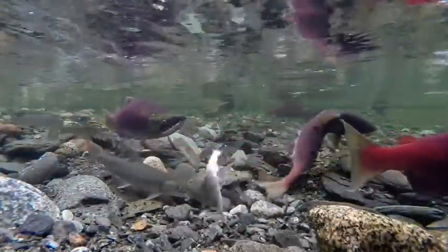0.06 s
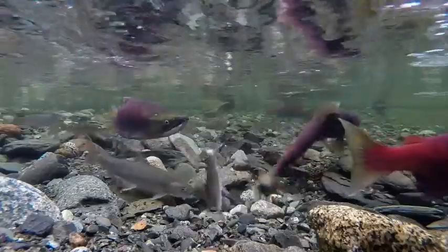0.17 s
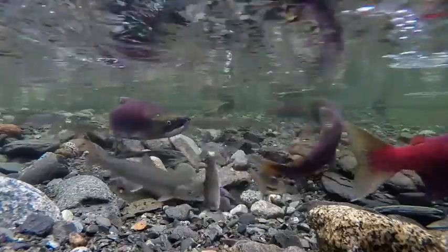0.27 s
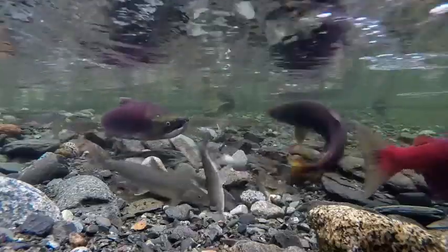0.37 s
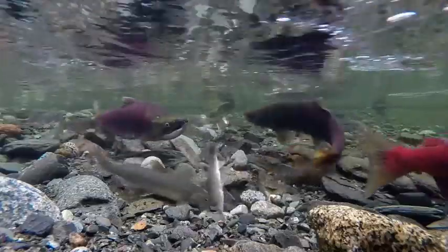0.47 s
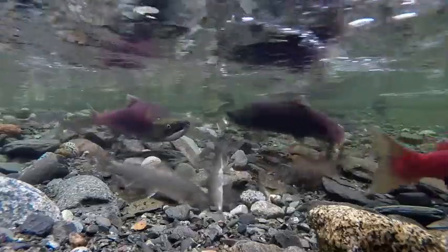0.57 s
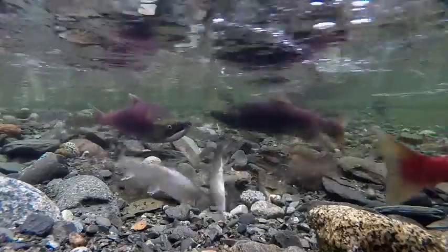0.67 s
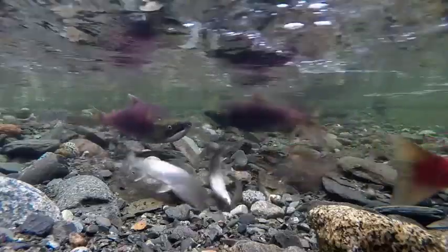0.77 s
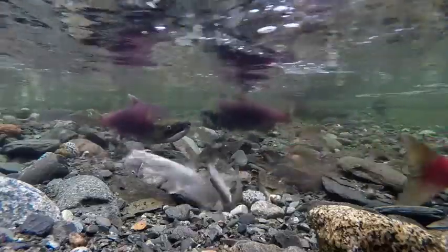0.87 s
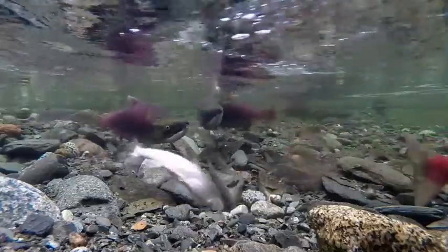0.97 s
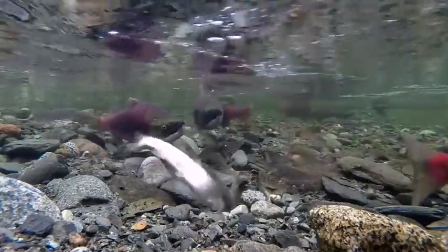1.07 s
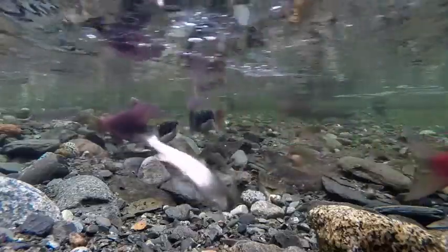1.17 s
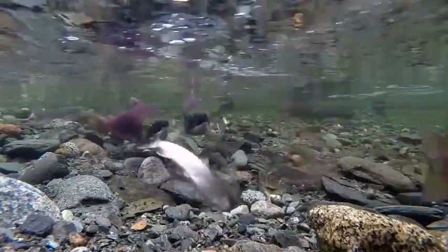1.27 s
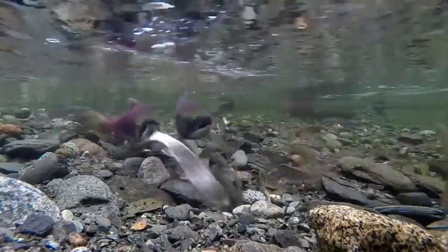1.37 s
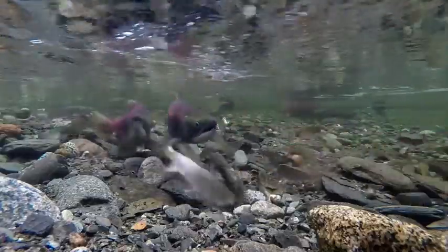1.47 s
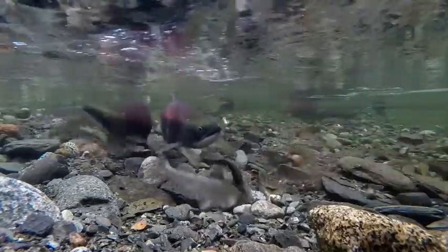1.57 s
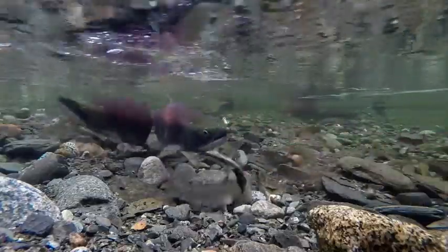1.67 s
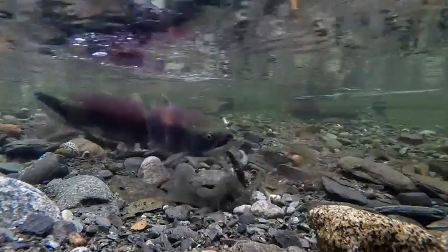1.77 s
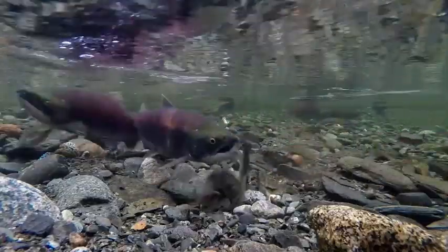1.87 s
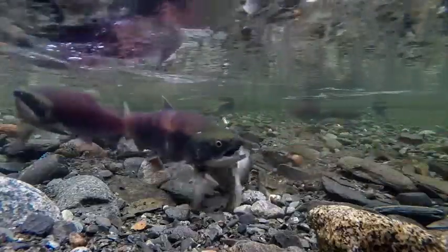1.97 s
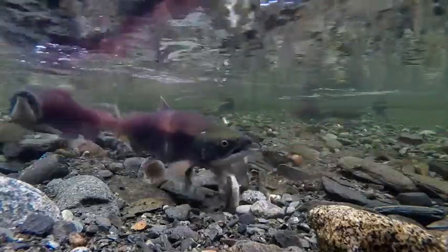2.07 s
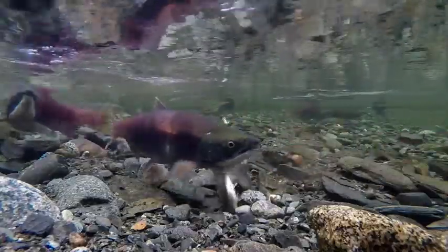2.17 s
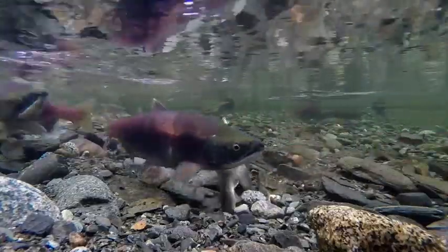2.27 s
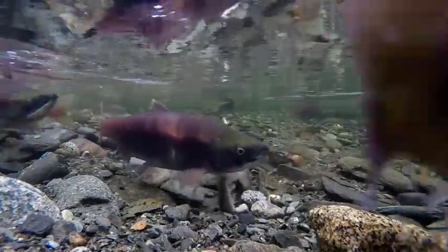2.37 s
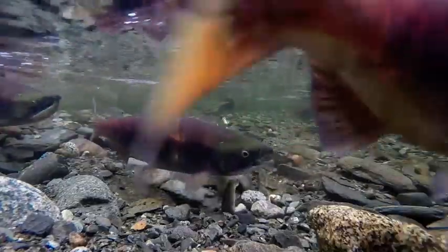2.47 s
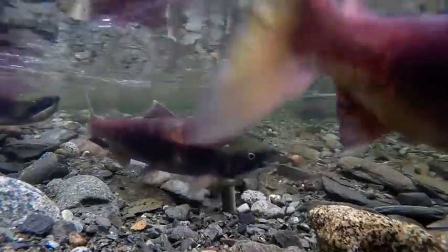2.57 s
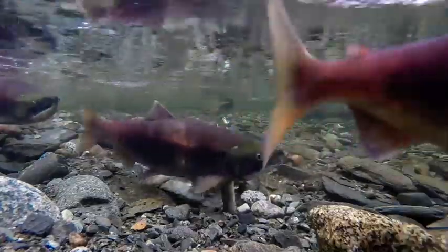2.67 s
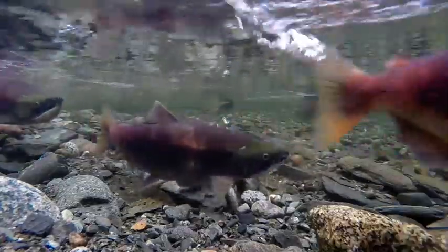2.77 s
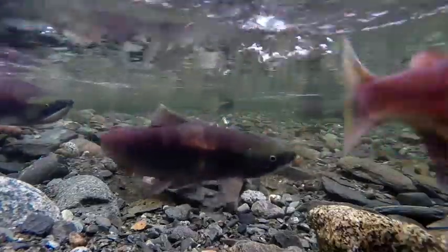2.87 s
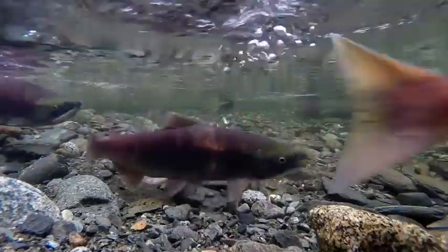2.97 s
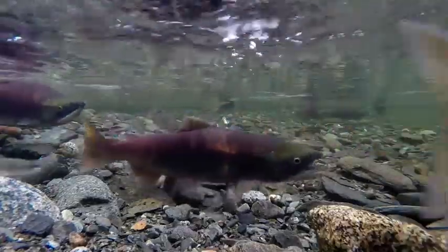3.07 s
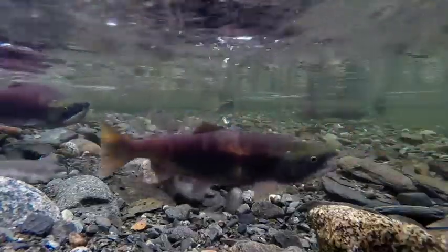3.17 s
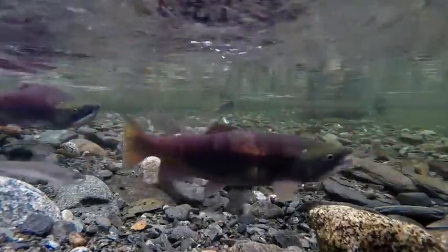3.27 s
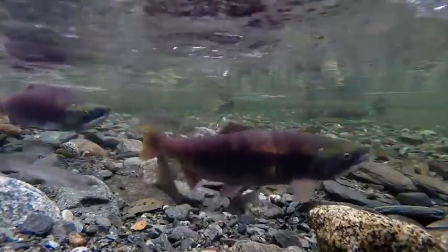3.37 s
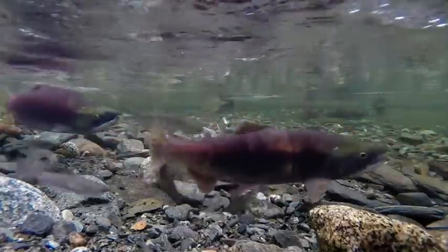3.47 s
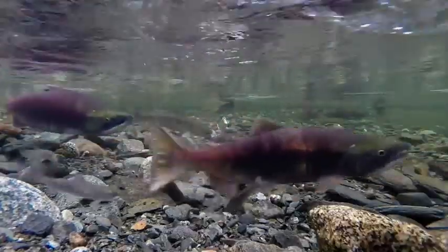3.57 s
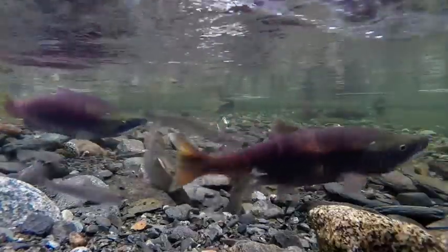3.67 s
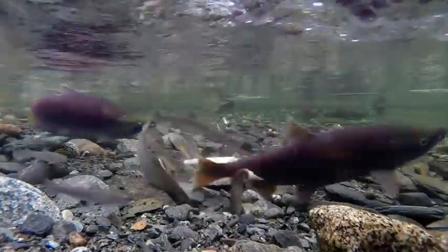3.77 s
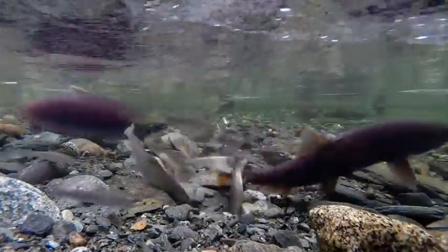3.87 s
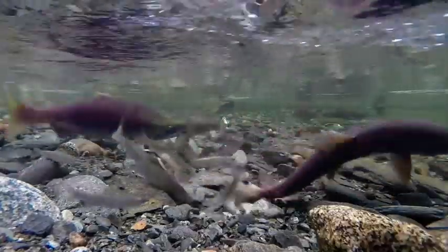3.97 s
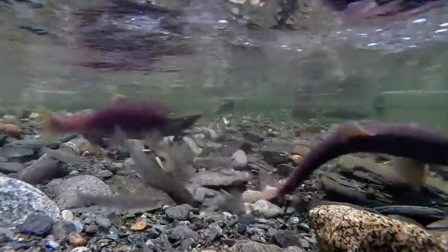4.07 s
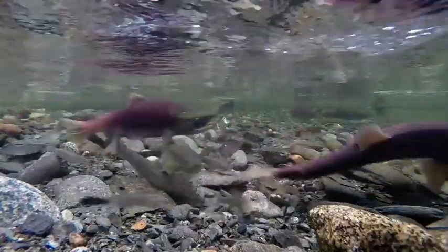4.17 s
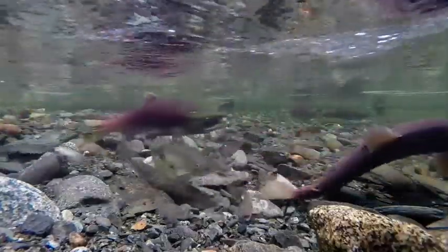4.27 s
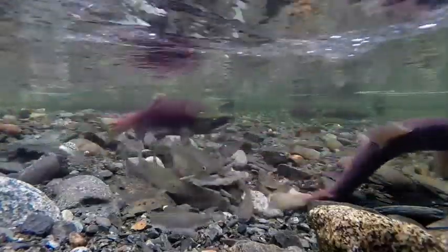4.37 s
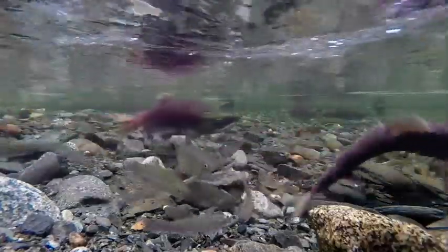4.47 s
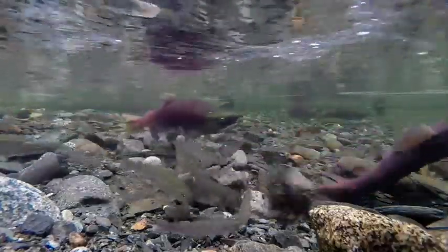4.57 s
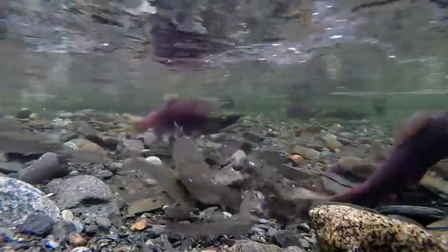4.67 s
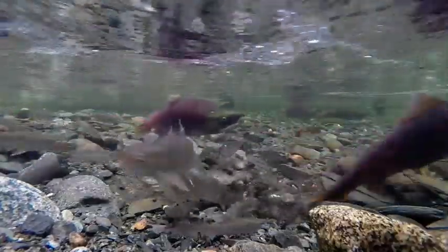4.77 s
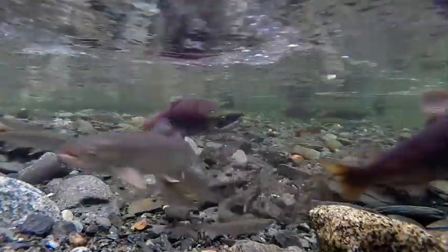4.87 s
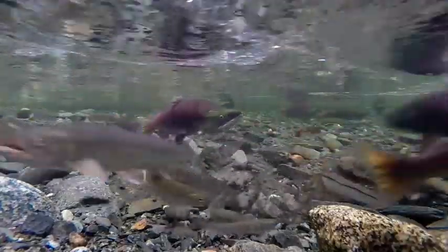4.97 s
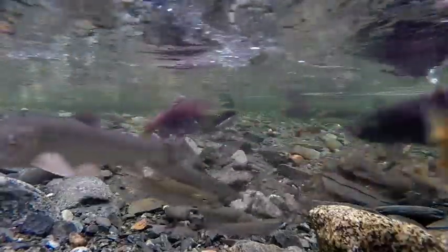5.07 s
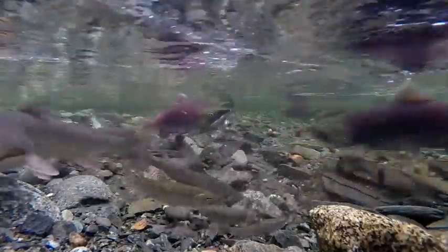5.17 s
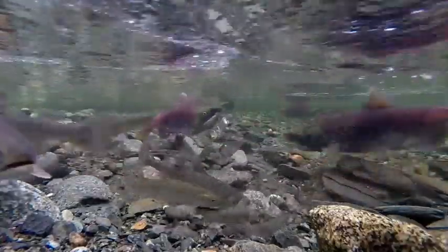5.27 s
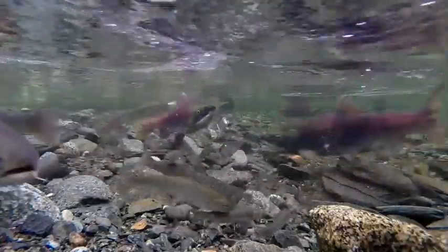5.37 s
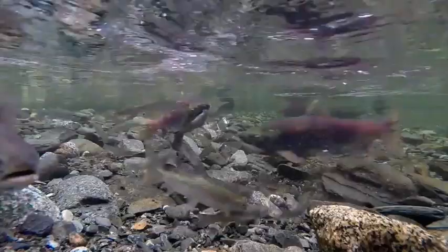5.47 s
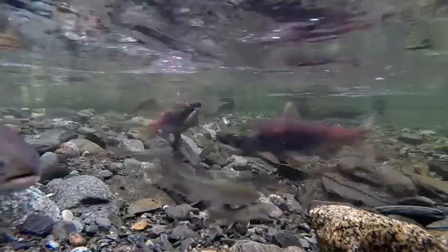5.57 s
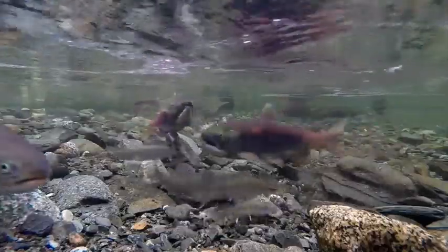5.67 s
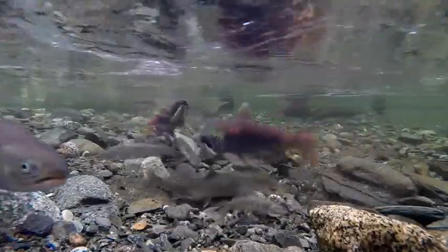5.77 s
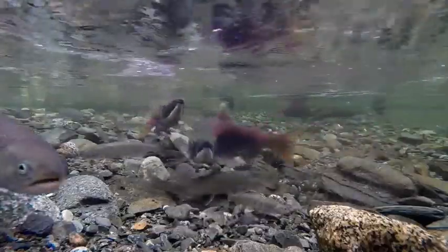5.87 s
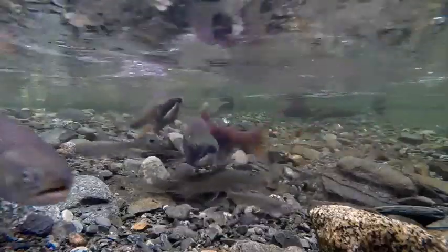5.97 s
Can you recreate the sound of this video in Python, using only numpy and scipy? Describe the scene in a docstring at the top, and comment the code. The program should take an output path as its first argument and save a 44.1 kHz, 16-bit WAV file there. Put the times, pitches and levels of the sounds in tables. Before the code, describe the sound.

Heard from inside a sealed housing under a shallow stream: pebbles click and gravel crackles in a short burst, then it quiets to soft rumbling and sparse ticks. Midway a fish brushes and loudly knocks the housing, which shudders deeply. A muffled splash and blipping bubbles follow, then stones clatter again, harder and denser, before fading to faint hiss.

```python
"""Salmon stir the gravel of a shallow stream, heard by a microphone in a camera housing under water.
Pebbles click and gravel crackles through the housing's resonances, as single filtered clicks and showers of
random grains, with a few bubbles and one short 6.4 kHz ring; tail beats rumble, and the current hisses.
Midway a fish brushes and knocks the housing, which rings and rocks on its mount; then its tail tears
the surface, bubbles sound as dying tones, foam fizzes faintly, and the stones clatter again."""
import sys
import numpy as np
from scipy import signal
from scipy.fft import rfft, irfft
from scipy.io import wavfile
from scipy.ndimage import uniform_filter1d

SR = 44100
rng = np.random.default_rng(int(sys.argv[2]) if len(sys.argv) > 2 else 0)


def output_pcm(signal):
    """Save a mono or channel-first signal as 16-bit PCM at the path in sys.argv[1].

    Samples are clipped to [-1, 1] before scaling.
    """
    pcm = np.clip(np.atleast_2d(signal).T, -1, 1) * 32767
    wavfile.write(sys.argv[1], SR, np.round(pcm).astype(np.int16))


N = 265041
TIME = np.arange(N) / SR
TAPS_HZ = np.fft.rfftfreq(4096, 1 / SR)  # frequency grid of the short clicks


def gain_of(db):
    """Decibels to amplitude."""
    return 10 ** (np.asarray(db) / 20)


def evened(x):
    """Scales to rms 1."""
    return x / np.sqrt(np.mean(x ** 2) + 1e-20)


def spectrum_db(points, hz):
    """Reads a spectrum's dB on a log-frequency axis."""
    points_hz, db = np.transpose(points)
    return np.interp(np.log(hz + 1), np.log(points_hz + 1), db)


def level_curve(rows):
    """A dB curve as a gain for every sample, silent outside its span."""
    s, db = np.transpose(rows)
    return gain_of(np.interp(TIME, s, db)) * (TIME >= s[0]) * (TIME <= s[-1])


def swell(s, db, rise_s, hold_s, fall_db_per_s):
    """A gain that rises smoothly to its full level at time s, holds, and dies away."""
    rise = np.exp(-(np.minimum(TIME - s, 0) / rise_s) ** 2)
    return rise * gain_of(db - fall_db_per_s * np.maximum(TIME - s - hold_s, 0))


def add(mix, s, sound):
    """Mixes a sound in at time s."""
    part = mix[max(round(s * SR), 0):][:len(sound)]
    part += sound[:len(part)]


def noise(points):
    """Noise of rms 1 with the given spectrum."""
    shape = gain_of(spectrum_db(points, np.fft.rfftfreq(N, 1 / SR)))
    return evened(irfft(rfft(rng.standard_normal(N)) * shape, N))


def wander(hz):
    """Slow chance of rms 1, up to the given rate."""
    slow = np.fft.rfftfreq(N, 1 / SR) < hz
    return evened(irfft(rfft(rng.standard_normal(N)) * slow, N))


def causal(db):
    """The sharpest click that has this spectrum: its minimum-phase response."""
    log_gain = np.log(gain_of(np.maximum(db, db.max() - 100)))
    circle = np.concatenate([log_gain, log_gain[-2:0:-1]])
    return np.fft.ifft(np.exp(np.conj(signal.hilbert(circle)))).real


def click(treble_db, scatter_db=1.0, neutral_db=-12, knee_hz=2400, shelf_hz=8000, top_hz=14000, low_hz=380):
    """One pebble contact heard through the housing; soft contacts lack treble."""
    # resonances of the housing: (frequency [Hz], width [Hz], relative level [dB])
    resonances = [(570, 99, -6), (756, 71, -5.5), (1479, 82, 1.5), (1600, 130, -5), (1904, 170, -2),
                  (2350, 180, 2), (2584, 210, 1), (3040, 260, -4.5), (3667, 100, -1), (4524, 520, 1.5),
                  (5120, 380, 3.5), (6450, 380, -4.5), (7350, 390, 4), (8200, 700, -7.5), (9620, 800, -6),
                  (11030, 940, -9), (12900, 780, -24.5)]
    f = TAPS_HZ + 1
    power = gain_of(-47.5)  # floor between the resonances
    for hz, width, db in resonances:
        power = power + gain_of(db) ** 2 / (1 + ((f - hz) / width) ** 2) ** 2.4
    power = power / (1 + (f / top_hz) ** 10) / (1 + (low_hz / f) ** 4)
    octaves_up = np.log2((1 + (f / knee_hz) ** 4) / (1 + (f / shelf_hz) ** 4)) / 4
    tilt_db = 1.34 * np.clip(treble_db - neutral_db, -26, 3) * octaves_up
    # every stone and every path to the housing colours the click a little differently
    own = np.interp(np.log(f), np.linspace(np.log(300), np.log(SR / 2), 36), rng.standard_normal(36))
    return causal(10 * np.log10(power) + tilt_db + scatter_db * own)


def pebbles(chatter=0.42, chatter_s=0.0012, heavy_db=-20):
    """Single stones strike each other and chatter as they settle, the heavy dull ones for longer."""
    # pebble hits: (time, before a small common delay [s], peak level [dB],
    # treble rating, high for a small hard pebble [dB])
    hits = [(0.0628, -40.5, -21), (0.1046, -24.5, -31), (0.111, -28, -21.5), (0.1177, -25, -21.5),
            (0.1495, -30, -20.5), (0.31, -43.5, -16), (0.416, -26.5, 2), (0.4322, -29.5, -5.5),
            (0.48, -42.5, 0), (0.5013, -38.5, -9), (0.595, -42, -11), (0.6325, -42.5, 6),
            (1.1037, -40.5, -16.5), (1.3751, -44.5, -37), (1.397, -34, -27), (1.4674, -38, -44),
            (1.4945, -37, -22.5), (1.6419, -38.5, -46), (1.6926, -39, -17.5), (1.7195, -46, -33),
            (2.0439, -36.5, -15), (2.0665, -36.5, -46), (2.1191, -42, -20.5), (2.2117, -45, -16),
            (2.4069, -30, 2), (3.354, -37, -30), (3.4384, -33, -18), (3.9445, -31.5, -18),
            (3.9574, -33.5, -15), (3.9896, -33.5, -15), (4.0332, -28, -58), (4.0461, -39.5, -48),
            (4.139, -29.5, -12.5), (4.1597, -34, -21), (4.2371, -34.5, -15), (4.2806, -34.5, -34),
            (4.4078, -34, -13.5), (4.5026, -32.5, -11), (4.526, -31, -9), (4.5448, -20.5, -12),
            (4.5804, -26, -6), (4.657, -26.5, -5), (4.797, -33.5, -19), (4.8267, -33, -20),
            (4.8502, -23, -10), (4.901, -31, -16.5), (4.9087, -30.5, -12.5), (5.0004, -14.5, -4),
            (5.0935, -33, -1), (5.1278, -31, -8), (5.154, -35, -60), (5.1764, -35, -19), (5.1839, -36, -4),
            (5.3085, -28, -20)]
    out, t = np.zeros(N), np.arange(500) / SR
    for s, db, treble_db in hits:
        settle_s = chatter_s * np.clip(treble_db / heavy_db, 1, 2)
        touches = rng.standard_normal(len(t)) * (rng.random(len(t)) < .2)
        contact = chatter * touches * np.exp(-t / settle_s)
        contact[0] = 1  # the first strike
        hit = signal.fftconvolve(click(treble_db), contact)
        add(out, s + 0.00096, gain_of(db) * hit / abs(hit).max())
    return out


def grains(per_s, spread_db, treble_db, count=16):
    """A shower of small contacts of random size and hardness, at rms 1."""
    out = np.zeros(N)
    for hardness in np.linspace(-1, 1, count):
        size = gain_of(np.minimum(spread_db * rng.exponential(1, N), 14))
        train = size * rng.choice([-1, 1], N) * (rng.random(N) < per_s / count / SR)
        out += signal.oaconvolve(train, evened(click(treble_db + 6 * hardness)))[:N]
    return evened(out)


def gravel(grit_db=-1, sand_db=-5.0, stones_db=-4, stray_db=-75, clump_db=4):
    """Slides patter down in clumps of small stones, grit and sand; stray grains tick in the current all along."""
    # slides of gravel: (time [s], level before clumping and mixing [dB], length [s])
    slides = [(0.113, -61.5, 0.045), (0.23, -61.5, 0.02), (0.306, -60.5, 0.041), (0.412, -65, 0.037),
              (0.569, -62, 0.0085), (3.961, -61.5, 0.003), (4.154, -71, 0.26), (4.46, -62, 0.03),
              (4.501, -52, 0.071), (4.653, -56, 0.074), (4.842, -54, 0.03), (4.972, -54, 0.015),
              (5.108, -56.5, 0.008), (5.187, -63, 0.082)]
    rise_s, fall_db_per_s = 0.024, 161
    power = sum(swell(s, db, rise_s, length, fall_db_per_s) ** 2 for s, db, length in slides)
    sliding = np.sqrt(power) * gain_of(clump_db * wander(hz=91.3))
    stones = gain_of(stones_db) * grains(per_s=70, spread_db=4, treble_db=-11)
    grit = gain_of(grit_db) * grains(per_s=400, spread_db=5, treble_db=-12)
    sand = gain_of(sand_db) * grains(per_s=1800, spread_db=4, treble_db=-10)
    stray = gain_of(stray_db) * grains(per_s=20, spread_db=3, treble_db=-16.5)
    return sliding * (stones + grit + sand) + stray


def cobbles(grind_s=0.0025, grind=0.28):
    """Larger stones rock against their neighbours with a dull, gritty clunk."""
    # cobbles shifting in the bed: (time [s], peak level [dB])
    shifts = [(0.083, -45), (0.184, -34), (0.214, -38.5), (0.222, -44), (0.233, -39.5), (2.045, -39),
              (2.068, -40), (2.553, -46.5), (4.047, -45), (4.132, -42), (4.182, -41), (4.567, -42),
              (4.994, -43), (5.197, -44)]
    # spectrum of a clunk: (frequency [Hz], relative level [dB])
    colour = [(150, -7), (350, -15.5), (520, -2), (760, 3.5), (950, -13), (1250, -21), (1480, 0),
              (1900, -21), (2600, -20.5), (6000, -41.5)]
    out, t = np.zeros(N), np.arange(SR // 50) / SR
    clunk = causal(spectrum_db(colour, TAPS_HZ))
    for s, db in shifts:
        contact = grind * rng.standard_normal(len(t)) * np.exp(-t / grind_s) + (t == 0)
        hit = signal.fftconvolve(clunk, contact)
        add(out, s, gain_of(db) * hit / abs(hit).max())
    return out


def collision(grip_db=1.0):
    """A fish rubs past as unsteady noise and bumps the housing, whose wall modes ring briefly."""
    # strokes of the fish's flank along the housing: (time [s], level [dB], rise [s], length [s])
    strokes = [(2.285, -19.5, 0.0074, 0.018), (2.33, -39, 0.004, 0.004), (2.362, -31.5, 0.0035, 0.0016),
               (2.384, -38, 0.004, 0.0042), (2.403, -44, 0.002, 0.006)]
    # spectrum of the rubbing: (frequency [Hz], relative level [dB])
    rub_colour = [(140, -43), (230, -3), (289, -25.5), (369, -1.5), (602, -7), (668, -8), (899, -11),
                  (1150, -33.5), (1230, -13.5), (1470, -17), (2800, -35), (3060, -46), (3700, -36.5),
                  (10200, -55), (15000, -76)]
    # blows on the housing: (time [s], peak level [dB], contact corner, low for a soft blow [Hz])
    blows = [(2.2842, -12.5, 1500), (2.2864, -4.5, 500), (2.2900, -5.5, 450), (2.2931, -11.5, 400),
             (2.2963, -12.5, 600), (2.3120, -19.5, 920), (2.3605, -10, 190), (2.409, -18.5, 2420)]
    # modes of the struck wall: (frequency [Hz], level before the contact roll-off [dB], 60 dB decay [s])
    wall = [(90.6, -15, 0.013), (127, 4.5, 0.08), (279, 11, 0.022), (445, -5, .035), (539, 9, 0.019),
            (730, -10, 0.013), (880, -6.5, 0.032), (935, 0.5, 0.03), (1236, 0, 0.042), (1450, 5, 0.019),
            (2300, -3.5, 0.012)]
    rubbing = sum(swell(*stroke, fall_db_per_s=882) for stroke in strokes)
    out = rubbing * evened(noise(rub_colour) * gain_of(grip_db * wander(hz=400)))
    t = np.arange(SR // 5) / SR
    for s, db, corner_hz in blows:
        ring = np.zeros(len(t))
        for hz, mode_db, t60 in wall:
            mode = gain_of(mode_db - 60 * t / t60) * np.sin(2 * np.pi * hz * t)
            ring += mode / np.hypot(1, hz / corner_hz)
        ring *= 1 - np.exp(-4 * np.pi * corner_hz * t)  # soft blows also start slowly
        add(out, s, gain_of(db) * ring / abs(ring).max())
    return out


def rocking(rock_hz=39.3, overtone_db=-6):
    """Pushed by the fish, the housing rocks widely on its mount; a small sway outlasts the push."""
    start_s, rock_db, rise_s, hold_s, fall_db_per_s = 2.2925, -17.5, 0.046, 0.038, 260
    sway_db, sway_hold_s, sway_fall_db_per_s = -38, 0.19, 186
    full_s = start_s + rise_s
    angle = 2 * np.pi * rock_hz * (TIME - start_s)
    push = np.sin(np.pi / 2 * np.clip((TIME - start_s) / rise_s, 0, 1))
    wide = push * gain_of(rock_db - fall_db_per_s * np.maximum(TIME - full_s - hold_s, 0))
    sway = swell(full_s, sway_db, rise_s / 2, sway_hold_s, sway_fall_db_per_s)
    swing = np.maximum(wide, sway)
    # wide swings press the mount against the stones, which flattens one side and adds an octave
    octave = gain_of(overtone_db) * swing / swing.max() * np.cos(2 * angle)
    return np.sqrt(2) * swing * (np.sin(angle) + octave)


def splash(spatter_db=4):
    """The torn surface spatters, muffled by the water above the housing; then its foam fizzes faintly."""
    # flicks of the tail that tear the surface: (time [s], level [dB], fall [dB/s])
    flicks = [(2.718, -53, 198), (2.833, -52, 550)]
    # spectra of the spatter and of the foam: (frequency [Hz], relative level [dB])
    splash_colour = [(150, -3), (400, 3), (800, 4), (1100, -30), (1500, 0), (2500, -16), (5000, -11),
                     (9000, -45), (15000, -50)]
    foam_colour = [(4000, -25), (5600, -10), (6000, 5), (6500, -18), (9300, -19), (10100, -2), (11000, -20),
                   (14000, -17), (16000, -30)]
    spatter = gain_of(spatter_db * wander(hz=200))
    torn = sum(swell(s, db, 0.006, 0, fall) for s, db, fall in flicks)
    foam = swell(s=3.15, db=-75.5, rise_s=0.081, hold_s=0.16, fall_db_per_s=55)
    return torn * evened(noise(splash_colour) * spatter) + foam * evened(noise(foam_colour) * spatter)


def dying_tones(rise_s=0.0021, wobble_db=2):
    """Bubbles, and one short 6.4 kHz ring among the pebble clicks at 0.579 s, sound as dying, wobbling tones.

    A bubble's pitch glides with its shape and depth."""
    # bubbles and the one ring: (time [s], level before onset and wobble [dB], starting pitch [Hz],
    # final pitch [Hz], glide [s], 60 dB decay [s])
    tones = [(0.372, -40.5, 2180, 2460, 0.0047, 0.03), (0.579, -28.5, 6350, 6450, .005, 0.012),
             (0.738, -45.5, 490, 440, 0.0087, 0.063), (0.921, -51.5, 2550, 2650, .005, 0.037),
             (2.711, -34, 404, 292, 0.018, 0.17), (2.740, -42, 2380, 2300, .005, 0.043),
             (2.766, -47.5, 317, 500, .06, 0.65), (2.829, -34.5, 520, 502, 0.0096, 0.21),
             (2.831, -27, 765, 730, 0.0066, 0.041), (2.852, -41, 1646, 1410, 0.0076, 0.067),
             (2.879, -41.5, 1420, 1420, .01, .11), (3.075, -46.5, 2360, 2360, .005, 0.08),
             (3.077, -44, 795, 900, 0.0097, 0.047)]
    out, t = np.zeros(N), np.arange(SR // 3) / SR
    for s, db, start_hz, end_hz, glide_s, t60 in tones:
        hz = end_hz + (start_hz - end_hz) * np.exp(-(t / glide_s) ** 2)
        tone = np.sin(2 * np.pi * np.cumsum(hz) / SR)
        add(out, s, gain_of(db - 60 * t / t60) * (1 - np.exp(-t / rise_s)) * tone)
    return out * gain_of(wobble_db * wander(hz=150))


def stream(hiss_db=-60.08, flutter_db=0.23, ring_db=-73):
    """The current hisses steadily; churning water and tail beats shake the housing at its low resonance."""
    # slow churning of the water around the housing: (time [s], level [dB])
    churn = [(0, -44), (0.5, -49.5), (0.62, -57), (0.88, -51), (1.0, -59), (1.32, -53.5), (1.45, -45),
             (2.0, -50), (2.78, -53), (2.95, -59.5), (3.3, -46.5), (3.62, -62), (4.0, -46.5), (4.38, -52),
             (5.0, -47), (5.33, -52.5), (5.5, -61.5), (6.01, -61.5)]
    # tail beats that push water against the housing: (time [s], level [dB])
    tail_beats = [(0.145, -44), (0.21, -37.5), (0.37, -42.5), (0.75, -41), (0.845, -45), (1.1, -50),
                  (1.71, -51), (1.915, -44.5), (3.21, -44.5), (4.157, -38), (4.431, -41), (4.595, -46),
                  (4.645, -51), (5.09, -46.5), (5.15, -43.5), (5.335, -46)]
    # spectra of the rumble and of the current: (frequency [Hz], relative level [dB])
    rumble_colour = [(15, -29.5), (30, -12.5), (45, -4.5), (62, 0), (76, -2), (90, 1), (115, -22),
                     (160, -28.5), (300, -41), (600, -63)]
    current_colour = [(76, -44.5), (130, 0), (156, -3.5), (186, -5.5), (289, -6.5), (487, -10), (619, -11),
                      (835, -13), (1150, -15), (2140, -18), (3260, -20.5), (4400, -25), (4960, -30),
                      (14300, -42.5), (15500, -47)]
    # spectrum of a steady bright noise, strongest near 5 kHz: (frequency [Hz], relative level [dB])
    ring_colour = [(3500, -24), (4700, -1.5), (5100, 0.0), (5600, -7.5), (6800, -9), (7350, -7),
                   (8200, -13), (11000, -13.5), (15000, -32.5)]
    shake = noise(rumble_colour)
    shake /= np.sqrt(uniform_filter1d(shake ** 2, size=4000) + 0.022)  # evens out its slow level changes
    beats = sum(swell(s, db, rise_s=0.014, hold_s=0.011, fall_db_per_s=298) for s, db in tail_beats)
    rumble = np.hypot(level_curve(churn), beats) * shake
    hiss = gain_of(hiss_db + flutter_db * wander(hz=25.7)) * noise(current_colour)
    ring = gain_of(ring_db) * noise(ring_colour)
    return rumble + hiss + ring


def scene():
    """Everything reaches one microphone inside the housing."""
    stones = pebbles() + gravel() + cobbles()
    fish = collision() + rocking() + splash()
    return (stones + fish + dying_tones() + stream())[None]


def record(dry):
    """The recorder's band limit: a steep low-pass at 15.5 kHz."""
    low_pass = signal.firwin(511, 15500, window=("kaiser", 9), fs=SR)
    return signal.oaconvolve(dry, low_pass[None], "same")


dry = scene()
out = record(dry)
output_pcm(out)
```